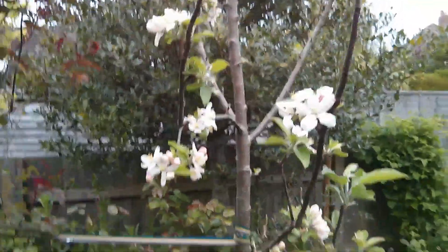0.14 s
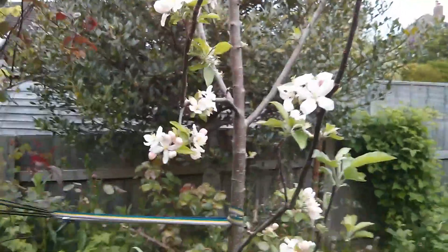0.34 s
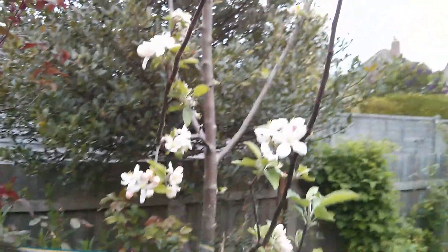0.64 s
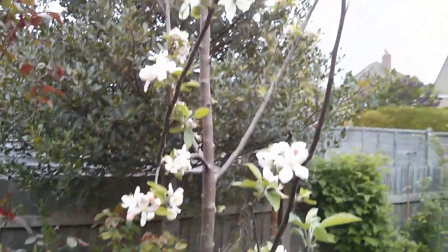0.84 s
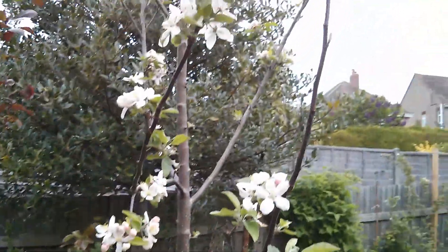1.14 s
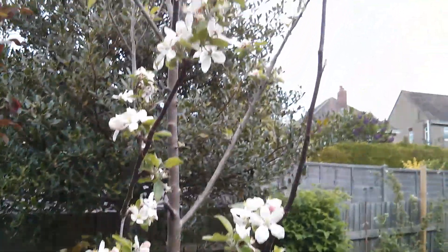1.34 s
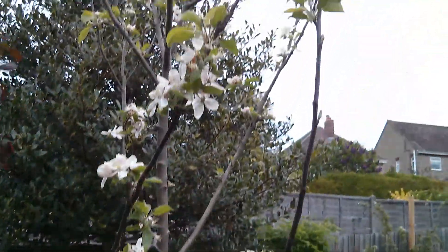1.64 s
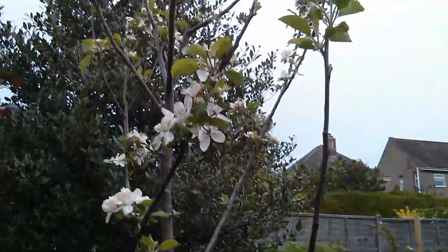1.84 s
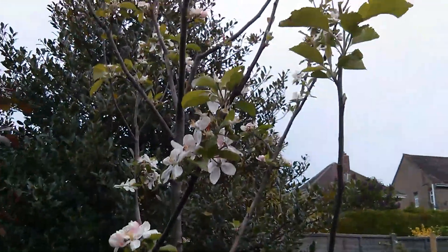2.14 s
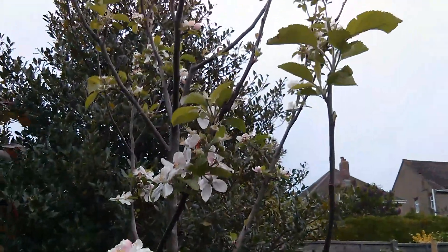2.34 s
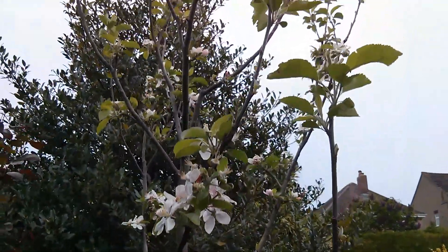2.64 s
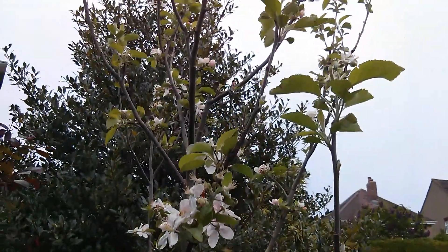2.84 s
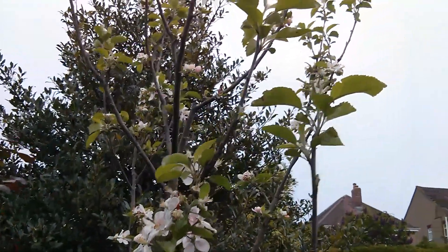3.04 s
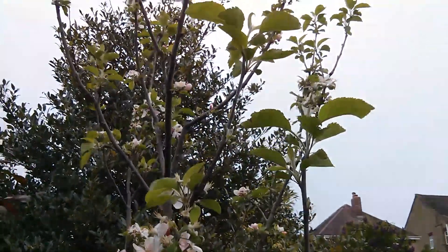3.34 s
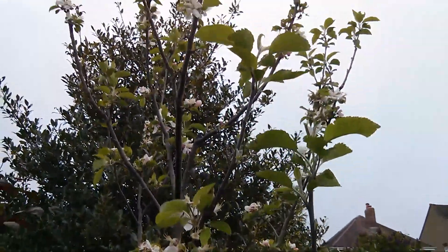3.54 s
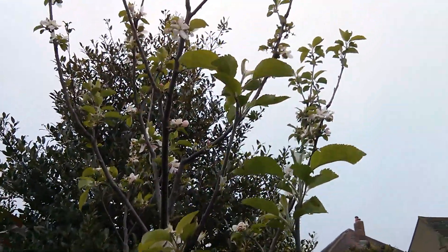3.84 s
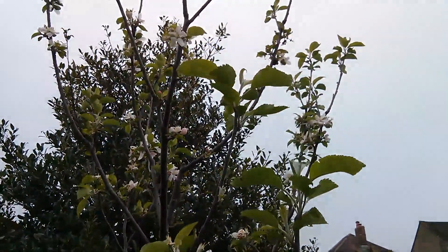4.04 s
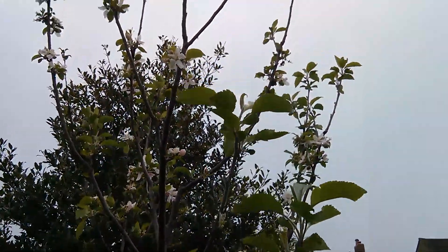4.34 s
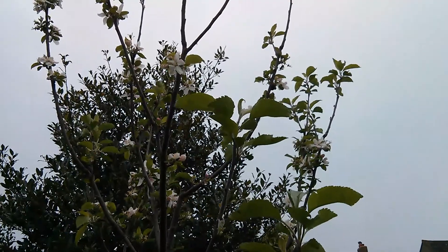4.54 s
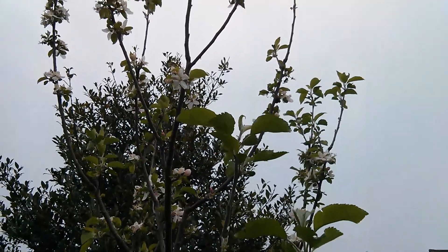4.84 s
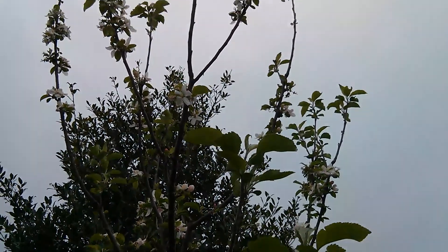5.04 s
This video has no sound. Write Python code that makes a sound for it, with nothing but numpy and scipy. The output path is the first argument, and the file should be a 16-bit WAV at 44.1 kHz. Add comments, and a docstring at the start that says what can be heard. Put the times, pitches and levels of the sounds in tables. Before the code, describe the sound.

A quiet garden heard through a small hand-held microphone. From 0 to 0.3 s a sleeve rubs with grainy rustle while lumpy low wind presses in, with a strong thump at about 0.26 s and lesser thumps at 0.7, 1.15 and 1.45-1.75 s. Small dull hand ticks fall around 0.5-0.85 s. A near blackbird starts softly under the rustle, its fluted whistle gliding and warbling up to 0.8 s; lower mellow notes follow at 0.9-1.25 s, then stronger, faster warbles until 1.8 s. At 1.9-2.05 s it breaks into a harsh stutter of rising chips, then squeaky chirps and buzzes to 2.5 s, and thin falling slurs at 2.6-2.9 s. Walls and trees return short echoes and a soft tail. Light brushing comes near 3 s. Afterwards steady faint wash and hiss remain, with a tiny tick at 3.7 s, faint far bird glides from 3.45 s, clearer around 4.9-5.1 s, and a soft handling tick at 5.02 s.

```python
"""Blackbird in a breezy garden

A near bird sings one phrase: sines with faint overtones glide and warble, then break into a fast twitter.
Echoes from walls and a soft tail from trees and houses follow it; far birds call as faint glides.
Wind on the hand-held microphone is lumpy low noise with single thumps; a sleeve is grainy noise.
Hand ticks and one faint burst of high hiss are short noises; a steady noise is far town and microphone hiss."""
import sys
import numpy as np
from scipy import signal
from scipy.fft import rfft, irfft, next_fast_len
from scipy.io import wavfile
from scipy.ndimage import uniform_filter1d

SR = 44100
rng = np.random.default_rng(int(sys.argv[2]) if len(sys.argv) > 2 else 0)


def to_wav(s):
    """Save 16-bit WAV."""
    ch = np.atleast_2d(s).T  # columns
    pcm = np.round(np.clip(ch, -1, 1) * 32767)  # PCM
    wavfile.write(sys.argv[1], SR, pcm.astype(np.int16))


N = 228862
T = np.arange(N) / SR  # time of every sample [s]

# Fluted whistles, each with one bout of warbling: (warble rate [per s], warble depth [Hz],
# middle of bout [s], spread of bout [s], overtone against the main tone [dB],
# curve of (time [s], pitch [Hz], level [dB]))
WHISTLES = [ (47, 330, .13, .09, -58.5, [(.03, 1555, -57.5), (.135, 1866, -49.5), (.2, 1920, -45),
            (.28, 2132, -63.5)]), (50, 24, 0.66, 0.23, -32.5, [(.285, 2158, -46.5), (.33, 1990, -40.5),
            (.41, 2244, -43.5), (.49, 2660, -46), (.555, 3200, -41.5), (.61, 3010, -47.5),
            (.665, 2650, -40), (.722, 2314, -51.5), (.802, 2410, -46.5)]),
            (32.8, 100, 1.04, 0.077, -61, [(.914, 1515, -61.5), (.94, 1685, -43), (.975, 1805, -41.5),
            (1.045, 1754, -43.5), (1.1, 1592, -46.5), (1.14, 1560, -53.5), (1.2, 1485, -55.5),
            (1.25, 1540, -62)]), (68.36, 183, 1.408, 0.17, -24.5, [(1.262, 1974, -53), (1.287, 2057, -39.5),
            (1.315, 1971, -39), (1.36, 1840, -44.5), (1.42, 2117, -41), (1.485, 2276, -40.5),
            (1.545, 2157, -46)]), (65.4, 201, 1.786, 0.072, -22.5, [(1.618, 3140, -42.5),
            (1.634, 2924, -56.5), (1.648, 2500, -35), (1.688, 2986, -37.5), (1.75, 2390, -37.5),
            (1.795, 2302, -37), (1.815, 2300, -52)]), ]
# Short notes, each one arc of pitch and one swell: (start [s], length [s], first pitch [Hz],
# middle pitch [Hz], last pitch [Hz], level [dB], loudest point [0-1 of length],
# warble rate [per s], warble depth [Hz], pitch jitter [share of pitch])
NOTES = [ (1.265, 0.027, 2380, 2720, 3218, -45.5, 0.3, 76, 23, 0.025),
         (2.14, 0.011, 5000, 4800, 4500, -40, .35, 0, 0, 0.035),
         (2.089, 0.28, 2200, 2587, 2516, -57.5, 0.4, 55, 130, 0.077),
         (2.1, .023, 3750, 5150, 3500, -31.5, .5, 0, 0, .03),
         (2.195, 0.072, 3400, 3270, 3220, -36, 0.7, 48, 138, .03),
         (2.324, .07, 6700, 6950, 6650, -60, .1, 141, 50, .012),
         (2.329, .02, 4700, 3950, 3450, -47.5, .5, 99, 145, .06),
         (2.365, .043, 9400, 9000, 8650, -62, .95, 143, 150, .012),
         (2.369, .034, 3400, 4100, 4300, -39, .6, 142, 400, .014),
         (2.396, 0.093, 5200, 5400, 4970, -52, 0, 150, 897, .06),
         (2.402, .108, 8650, 7850, 7650, -43, .3, 143, 340, .016),
         (2.571, .008, 3300, 5000, 8200, -41.5, .35, 0, 0, .04), ]
NOTE_EDGE_DB, NOTE_SHAPE = -5, 2  # a note starts and ends this far down; a higher shape holds it longer
# How far warbles swing the loudness at full depth: (warble rate [per s], swing [dB])
THROB = [(33, 7.5), (50, 6.5), (62, 1), (140, -2.5)]
FULL_THROB_HZ = 130  # warbles shallower than this throb less
WARBLE_ROUND = 1.43  # 2 is a sine; lower gives round crests and sharp dips
# The stuttering run of rising chips: (start [s], level before the chip trim [dB], reference pitch [Hz])
CHIPS = [(1.8924, -49.5, 4800), (1.9055, -39, 5230), (1.917, -42, 6000), (1.9318, -29.5, 6770),
         (1.9473, -31.5, 5650), (1.9554, -41, 6000), (1.9605, -37, 5730), (1.9704, -25.5, 6120),
         (1.9837, -33, 6240), (1.9934, -35.5, 5660), (2.0064, -33.5, 6160), (2.0164, -33, 6980),
         (2.0273, -43, 6400), (2.0374, -38, 7220)]
CHIP_S, CHIP_TRIM_DB = 0.0064, -1
CHIP_FROM, CHIP_TO = 0.73, 1.126  # every chip sweeps up between these shares of its reference pitch
# Harsh noise that rides on the chips: (frequency [Hz], relative level [dB per Hz])
RASP_COLOUR = [(3000, -12.5), (7000, 7), (11000, 7.5), (16000, -10)]
# Thin falling slurs that close the phrase:
# (start [s], length [s], first pitch [Hz], last pitch [Hz], level [dB])
SLURS = [(2.576, 0.083, 9200, 7020, -46), (2.713, 0.06, 6620, 5600, -45.5), (2.816, .076, 6540, 5450, -49)]
# Calls of far birds: (start [s], length [s], first pitch [Hz], last pitch [Hz],
# level before the far trim [dB])
FAR_CALLS = [(3.45, 0.64, 4810, 4680, -71), (4.28, 0.29, 5020, 5320, -68.5), (4.4, 0.37, 5320, 4970, -69.5),
             (4.58, 0.1, 1967, 2000, -77.5), (4.32, 0.1, 2116, 2080, -78), (4.88, 0.13, 3150, 4050, -69.5),
             (4.95, 0.14, 4420, 4860, -62.5), (5.07, 0.14, 3200, 4910, -64)]

# Echoes from fences and walls: (delay [s], smear [s], level [dB])
WALLS = [(.004, 0.0063, -5.5), (0.026, 0.02, -12.5), (0.085, .004, -13.5), (.108, 0.02, -17)]
# Tone of those echoes: (frequency [Hz], gain [dB])
WALL_COLOUR = [(1500, -11), (2500, 7.5), (3400, -3), (4800, -5.5), (6500, 2.5), (9000, -1.5)]
# Time for the garden tail to fade by 60 dB: (frequency [Hz], fade time [s])
GARDEN_T60 = [(1500, 0.68), (5000, 0.36), (10000, 0.71)]
# The microphone's small port, with a peak and a deep notch above it: (frequency [Hz], gain [dB])
PORT = [(1000, 1), (1500, -5), (1900, 3.5), (2300, -10), (2600, -17), (3000, -19.5), (3500, -17.5),
        (4200, -5.5), (5000, -5.5), (8500, -6), (11000, -10), (16000, -1)]

# Tone of the wind: (frequency [Hz], relative level [dB per Hz])
WIND_COLOUR = [(15, -25), (40, 2), (90, 0), (130, -9), (200, -18), (350, -32), (1500, -99)]
# Gusts: (start [s], length before the fall [s], level before the wind trim [dB])
GUSTS = [(-.03, .31, -40.5), (.3, 0.088, -45.5), (.42, 0.055, -51), (.65, 0.028, -36.5), (.8, 1.2, -59),
         (1.1, 0.14, -44.5), (1.32, .2, -42.5), (1.54, 0.25, -41), (3.2, 0.3, -67)]
GUST_RISE_S, GUST_FALL_S = 0.02, 0.059
CALM_DB = -77  # wind between gusts, before the wind trim
# Single eddies that hit the port: (middle [s], pitch [Hz], level before fading [dB])
BUFFETS = [(0.259, 95, -24.5), (0.683, 90, -39), (1.141, 130, -36), (1.458, 115, -29), (1.493, 90, -34),
           (1.577, 80, -31), (1.728, 110, -34.5)]

# Tone of the sleeve pressed hard: (frequency [Hz], relative level [dB per Hz])
SLEEVE_COLOUR = [(200, -23.5), (400, -15), (1000, -11), (1750, -8), (2500, -12.5), (3200, -24.5),
                 (5100, -6.5), (8600, -2.5), (10000, -8), (11500, -15), (15800, -22.5)]
# Firm strokes of the sleeve: (start [s], length before the fall [s], level [dB])
RUBS = [(.026, 0.26, -36), (.055, 0.042, -33.5), (.215, 0.059, -35), (.255, 0.094, -50.5),
        (.3, 0.079, -61.5), (.42, 0.087, -60.5)]
RUB_RISE_S, RUB_FALL_S = 0.07, 0.006
# Tone of the sleeve touching lightly: (frequency [Hz], relative level [dB per Hz])
BRUSH_COLOUR = [(200, -36), (450, -7), (1150, -1), (1500, -8.5), (2100, -9), (3100, -17), (4400, -6),
                (6000, -8.5), (9000, -19), (15800, -17.5)]
# Light brushes: (start [s], length before the fall [s], level [dB])
BRUSHES = [(-.04, 0.71, -65), (.42, 0.11, -59), (1.78, 0.42, -65), (2.47, 0.11, -65), (2.81, 0.23, -68.5),
           (2.95, 0.16, -65), (3.0, 0.062, -57), (3.19, 0.047, -71.5)]
BRUSH_RISE_S, BRUSH_FALL_S = 0.036, 0.026
# Small ticks of the hand on the casing, and at 3.73 s a faint, very short burst of high hiss:
# (start [s], level before fading [dB], band centre [Hz], band width [octaves], decay [s])
SHORT_BURSTS = [(0.498, -58.5, 375, 0.39, 0.41), (0.614, -41, 299, 0.99, 0.0076),
                (.624, -48, 336.5, 1.34, 0.0084), (0.848, -51.5, 3940, 0.36, 0.0018),
                (0.844, -51.5, 296.2, 0.92, 0.047), (3.73, -54.5, 12800, 1.6, .001),
                (4.113, -65, 6930, 0.74, 0.006), (5.024, -47, 675, 0.61, 0.012)]

# Tone of the background: (frequency [Hz], relative level [dB per Hz])
AIR_COLOUR = [(25, -1), (60, -16), (130, -12.5), (260, 0), (600, -9.5), (950, -9.5), (1750, -22),
              (2900, -38.5), (4600, -23), (6500, -28), (10500, -30), (15000, -24)]
AIR_DB = -66.5  # before the air trim
EDGE_HZ = 15900  # top of the recorder's band


def birds(rasp_db=-11.0, garden_db=-13.0, far_db=-4):
    """The near bird comes straight, by echoes and by the garden tail; far ones straight and by the tail."""
    near = whistles() + notes() + slurs() + chips(rasp_db)
    far = far_birds()
    song = near + walls(near)
    song = song + amp(garden_db) * garden(near, build_s=0.045)
    return colour(song + amp(far_db) * far, PORT)


def whistles(jitter=0.013, flutter_db=1.5, unsteady_s=0.0004):
    """The fluted opening: slow glides on which a warble swells and fades."""
    out, waver, flutter = np.zeros(N), drift(320), drift(110)
    clock = T + unsteady_s * drift(25)  # keeps the warble from being machine-even
    for rate, depth_hz, middle, spread, overtone_db, curve in WHISTLES:
        s, pitch, level_db = np.transpose(curve)
        on = (T >= s[0]) & (T <= s[-1])
        t = clock[on] - middle
        hz = np.interp(T[on], s, pitch) * (1 + jitter * waver[on])
        db = np.interp(T[on], s, level_db) + flutter_db * flutter[on]
        bout = np.exp(-(t / spread) ** 2)
        out[on] += warbled(t, hz, db, rate, depth_hz, bout, overtone_db)
    return out


def notes(overtone_db=-33, flutter_db=1.0):
    """Chirps and buzzes: the pitch bends through three points while the note swells and fades."""
    out, waver, flutter = np.zeros(N), drift(220), drift(150)
    for s, length, first_hz, middle_hz, last_hz, db, loudest, rate, depth_hz, jitter in NOTES:
        on = (T >= s) & (T <= s + length)
        u = (T[on] - s) / length  # 0 at the start of the note, 1 at its end
        arc = np.polyfit([0, 0.5, 1], [first_hz, middle_hz, last_hz], 2)
        hz = np.polyval(arc, u) * (1 + jitter * waver[on])
        swell_db = NOTE_EDGE_DB * np.interp(u, [0, loudest, 1], [1, 0, 1]) ** NOTE_SHAPE
        note_db = db + swell_db + flutter_db * flutter[on]
        t = T[on] - s - length / 2
        out[on] += warbled(t, hz, note_db, rate, depth_hz, 1, overtone_db)
    return out


def slurs():
    """Thin swoops whose pitch falls faster and faster, loudest past the middle."""
    return glides(SLURS, overtone_db=-46, bend=1.8, jitter=0.006, flutter_db=1.5, flutter_per_s=250, late=1.9)


def chips(rasp_db):
    """Very short upward sweeps; these forced notes turn harsh, so noise follows their loudness."""
    sweeps = []
    for s, db, hz in CHIPS:
        sweeps.append((s, CHIP_S, CHIP_FROM * hz, CHIP_TO * hz, db + CHIP_TRIM_DB))
    tones = glides(sweeps, overtone_db=-22.5, bend=0.6, jitter=0.05,
                   flutter_db=-0.5, flutter_per_s=720, late=0.92)
    loudness = uniform_filter1d(abs(tones), size=400)  # averaged over about 9 ms
    return tones + amp(rasp_db) * noise(RASP_COLOUR) * loudness


def far_birds():
    """Distant glides, heard straight and as an equally strong tail from trees and houses."""
    calls = glides(FAR_CALLS, overtone_db=-36, bend=0.8, jitter=0.032, flutter_db=4.0, flutter_per_s=114)
    return calls + garden(calls, build_s=0.0027)


def glides(rows, overtone_db, bend, jitter, flutter_db, flutter_per_s, late=1):
    """Swoops of unsteady pitch: bend under 1 slows them at the end, late over 1 moves the peak later."""
    out, waver, flutter = np.zeros(N), drift(flutter_per_s), drift(flutter_per_s)
    for s, length, first_hz, last_hz, db in rows:
        on = (T >= s) & (T <= s + length)
        u = np.clip((T[on] - s) / length, 0, 1)
        hz = (first_hz + (last_hz - first_hz) * u ** bend) * (1 + jitter * waver[on])
        level = amp(db + flutter_db * flutter[on]) * np.sin(np.pi * u ** late)
        out[on] += whistle(hz, overtone_db) * level
    return out


def warbled(t, hz, db, rate, depth_hz, bout, overtone_db):
    """One syllable: a warble of strength bout (0-1), cresting at t = 0, swings pitch and loudness."""
    crests = abs(np.cos(np.pi * rate * t)) ** WARBLE_ROUND
    warble = 2 * bout * (crests - crests.mean())
    throb_db = read(THROB, rate) * min(depth_hz / FULL_THROB_HZ, 1)
    fade = np.clip(np.minimum(t - t[0], t[-1] - t) / 0.002, 0, 1)  # 2 ms at both ends avoids clicks
    return whistle(hz + depth_hz * warble, overtone_db) * amp(db + throb_db * warble) * fade


def whistle(hz, overtone_db, third_db=-14):
    """The syrinx, a bird's voice organ: a sine on the pitch curve, with two weaker overtones."""
    phase = 2 * np.pi * np.cumsum(hz) / SR
    tone = 0
    for k, db in enumerate([0, overtone_db, overtone_db + third_db], 1):
        audible = k * hz < SR / 2  # leave out what is too high for the sample rate
        tone = tone + amp(db) * np.sin(k * phase) * audible
    return np.sqrt(2) * tone


def walls(x):
    """A few echoes, each smeared by boards and leaves into a short fading scatter."""
    t, echo = T[:SR // 4], np.zeros(SR // 2)
    for delay, smear, db in WALLS:
        taps = scatter(t) * np.exp(-t / smear)
        taps[0] = 2  # the flat face answers first
        add(echo, delay, amp(db) * taps / np.linalg.norm(taps))
    return signal.fftconvolve(colour(x, WALL_COLOUR), echo)[:N]


def garden(x, build_s):
    """A diffuse tail from trees and houses: it builds up, then each pitch range fades at its own speed."""
    hz, t, z = signal.stft(scatter(T[:SR]), SR, nperseg=256)
    z = z * amp(-60 * t / read(GARDEN_T60, hz)[:, None])
    z = z * (1 - np.exp(-t / build_s))
    tail = signal.istft(z, SR, nperseg=256)[1]
    return signal.fftconvolve(x, tail / np.linalg.norm(tail))[:N]


def scatter(t):
    """Sparse reflections of random sign, about 3000 a second."""
    signs = rng.choice([-1., 1.], len(t))
    return signs * (rng.random(len(t)) < 3000 / SR)


def wind(trim_db=-5.0, lumpy_db=10.5, eddy_cycles=0.54):
    """Lumpy turbulence at the port, and single eddies that push and then pull."""
    gusts = swells(GUSTS, GUST_RISE_S, GUST_FALL_S) + amp(CALM_DB)
    lumps = amp(trim_db + lumpy_db * np.tanh(drift(22)))
    out = noise(WIND_COLOUR) * gusts * lumps
    for s, hz, db in BUFFETS:
        turns = hz * (T - s)  # cycles away from the middle of the eddy
        out -= amp(db) * np.sin(2 * np.pi * turns) * np.exp(-(turns / eddy_cycles) ** 2)
    return out


def sleeve(grain_db=0.8, catch_db=0.6):
    """Cloth slides: fibres slip in tiny grains, and the stroke catches unevenly."""
    slips = amp(grain_db * drift(1100) + catch_db * drift(100))
    firm = noise(SLEEVE_COLOUR) * swells(RUBS, RUB_RISE_S, RUB_FALL_S)
    light = noise(BRUSH_COLOUR) * swells(BRUSHES, BRUSH_RISE_S, BRUSH_FALL_S)
    return unit(slips) * (firm + light)


def short_bursts():
    """Hand ticks and one burst of high hiss: fading noise, each in its own band and under 0.19 s long."""
    out, t = np.zeros(N), T[:8192]
    octave = np.log2(np.fft.rfftfreq(len(t), 1 / SR) + 1)
    for s, db, hz, width, decay in SHORT_BURSTS:
        band = np.exp(-((octave - np.log2(hz)) / width) ** 2 / 2)
        burst = irfft(rfft(rng.standard_normal(len(t))) * band)
        envelope = np.exp(-t / decay) * (1 - np.exp(-t * hz))
        add(out, s, amp(db) * unit(burst) * envelope)
    return out


def air(trim_db=-0.55, swell_db=1.63, rise_db=2.0):
    """One noise for the town's distant wash and the microphone's hiss, growing a little at the end."""
    rise = np.interp(T, [4.3, 5.1], [0, rise_db])
    return noise(AIR_COLOUR) * amp(AIR_DB + trim_db + swell_db * drift(5.9) + rise)


def swells(rows, rise_s, fall_s):
    """The gain of a row of pushes: each rises, holds and dies away; overlaps add as power."""
    power = np.zeros(N)
    for s, length, db in rows:
        rise = np.sin(np.pi / 2 * np.clip((T - s) / rise_s, 0, 1)) ** 2
        fall = np.exp(-np.maximum(T - s - length, 0) / fall_s)
        power += (amp(db) * rise * fall) ** 2
    return np.sqrt(power)


def noise(points):
    """Noise of rms 1 with a given spectrum."""
    return unit(colour(rng.standard_normal(N), points))


def drift(per_s):
    """A smooth random curve of rms 1 that changes about per_s times a second."""
    hz = np.fft.rfftfreq(N, 1 / SR)
    smooth = np.exp(-(hz / per_s) ** 2)
    return unit(irfft(rfft(rng.standard_normal(N)) * smooth, N))


def colour(x, points):
    """Filters a sound by a (frequency [Hz], gain [dB]) table."""
    size = next_fast_len(len(x) + 4096)
    gain = amp(read(points, np.fft.rfftfreq(size, 1 / SR)))
    return irfft(rfft(x, size) * gain, size)[:len(x)]


def read(points, hz):
    """Reads a table between its points, on a log-frequency axis."""
    f, value = np.transpose(points)
    return np.interp(np.log(hz + 1), np.log(f + 1), value)


def amp(db):
    """Turns decibels into gain."""
    return 10 ** (np.asarray(db) / 20)


def unit(x):
    """Scales a signal to rms 1."""
    return x / np.sqrt(np.mean(x ** 2) + 1e-20)


def add(mix, s, sound):
    """Mixes a sound in at time s [s]."""
    part = mix[max(round(s * SR), 0):][:len(sound)]
    part += sound[:len(part)]


def scene():
    """Everything meets at one microphone, where the sounds simply add up."""
    return (birds() + wind() + sleeve() + short_bursts() + air())[None]


def record(dry):
    """The recorder's band limit: a steep low-pass filter."""
    low_pass = signal.firwin(511, EDGE_HZ, window=("kaiser", 9), fs=SR)
    return signal.oaconvolve(dry, low_pass[None], "same")


dry = scene()
out = record(dry)
to_wav(out)
```